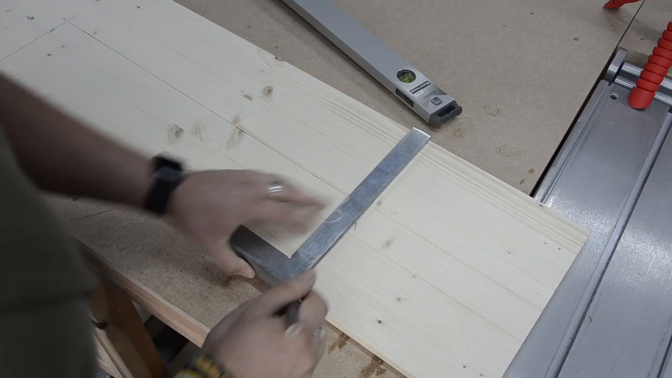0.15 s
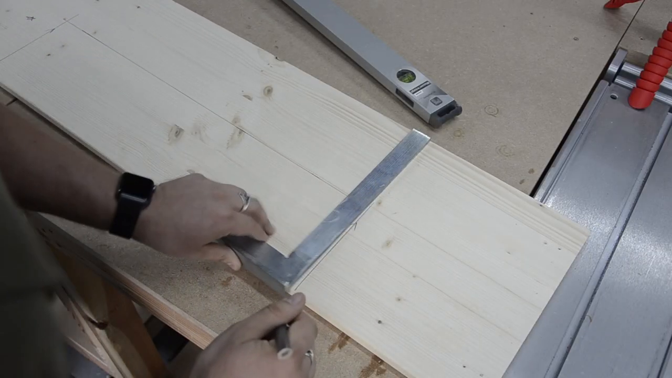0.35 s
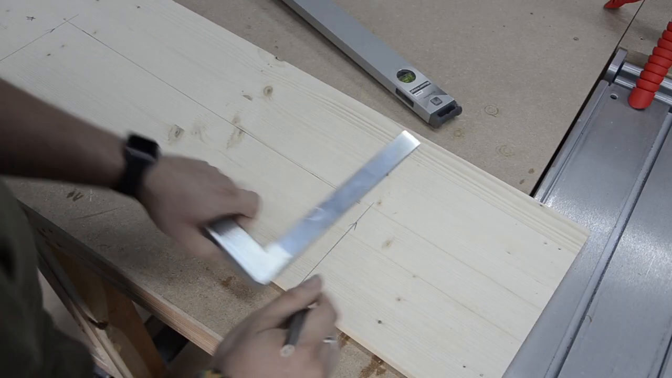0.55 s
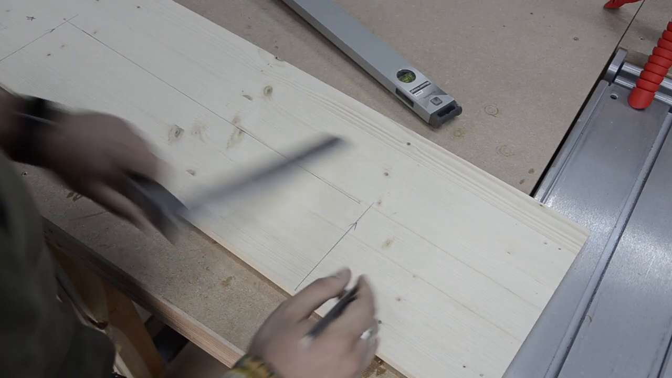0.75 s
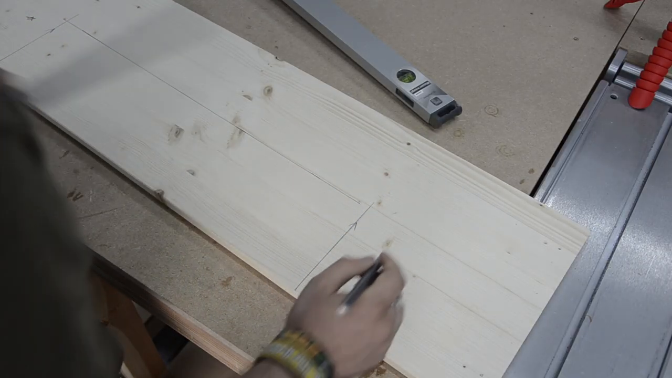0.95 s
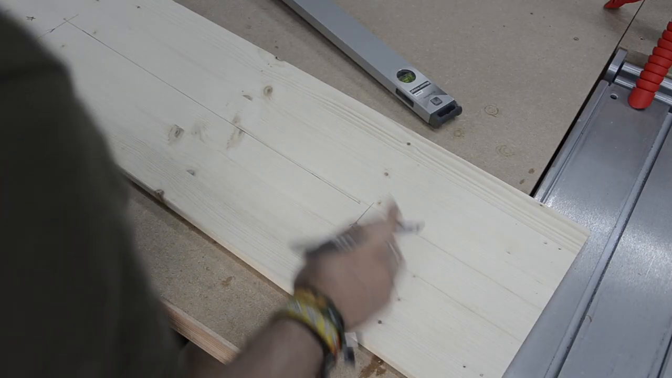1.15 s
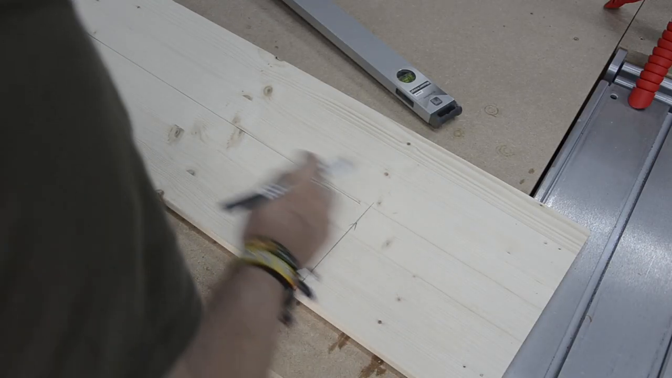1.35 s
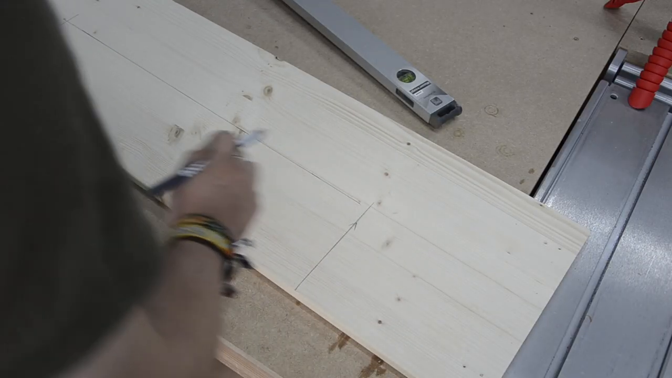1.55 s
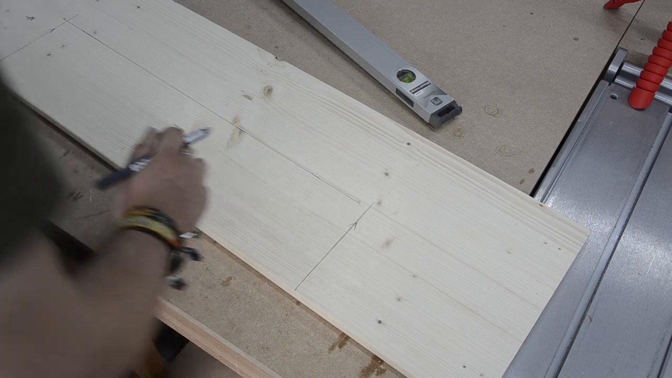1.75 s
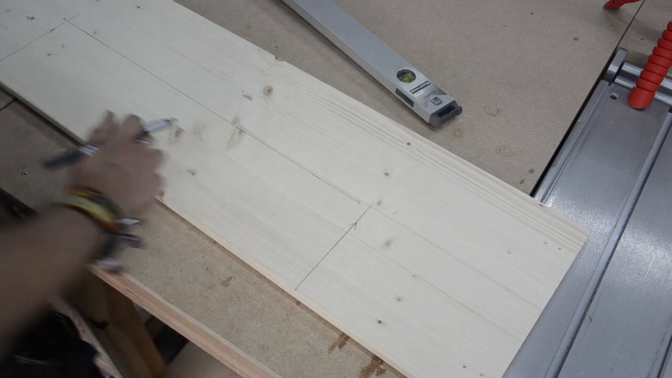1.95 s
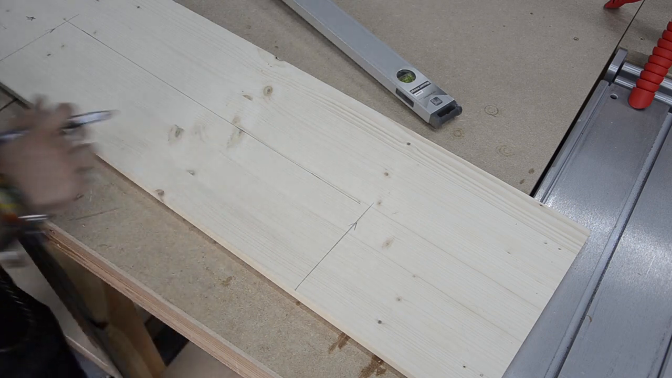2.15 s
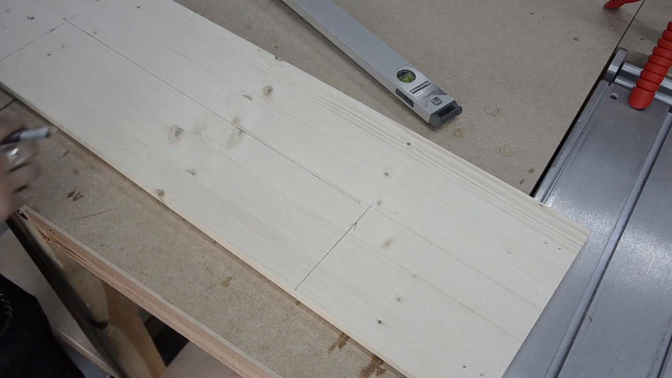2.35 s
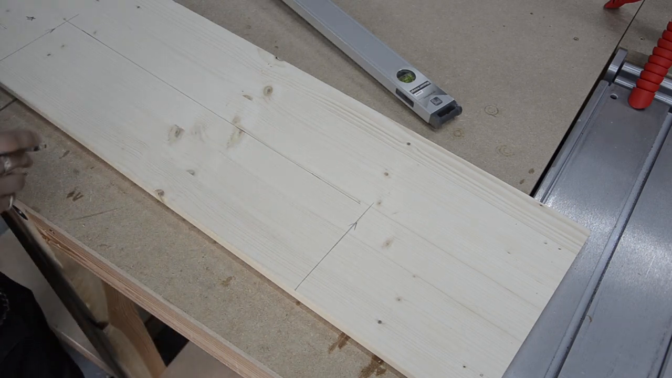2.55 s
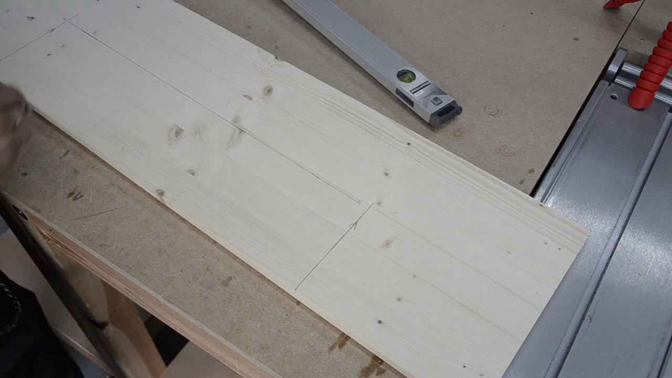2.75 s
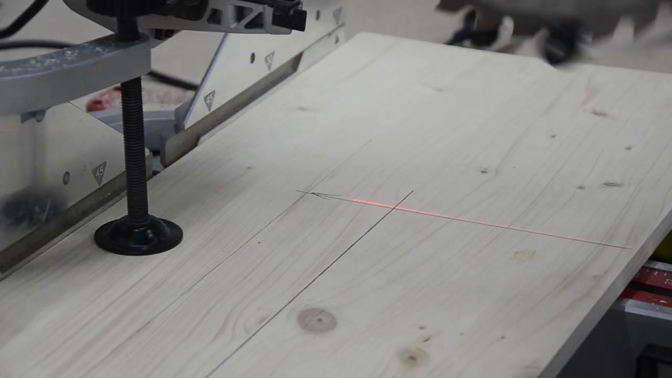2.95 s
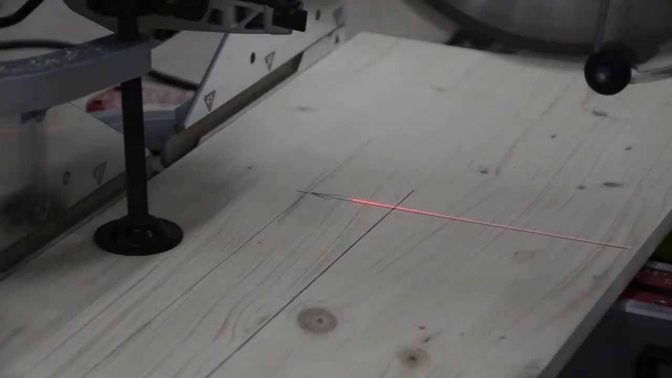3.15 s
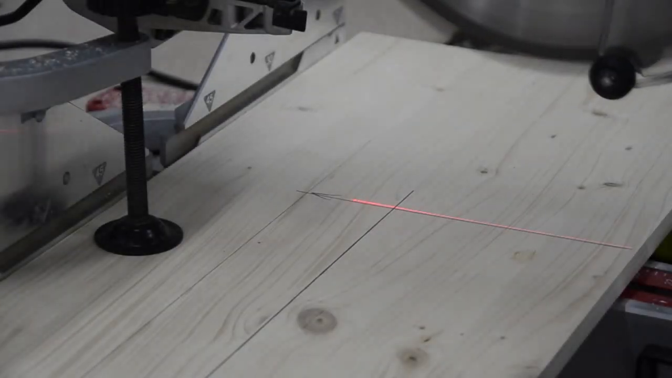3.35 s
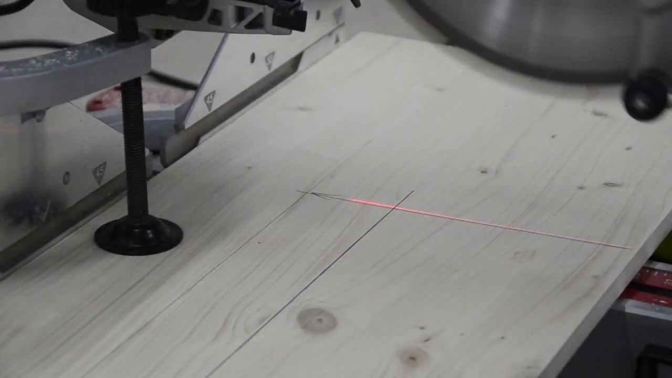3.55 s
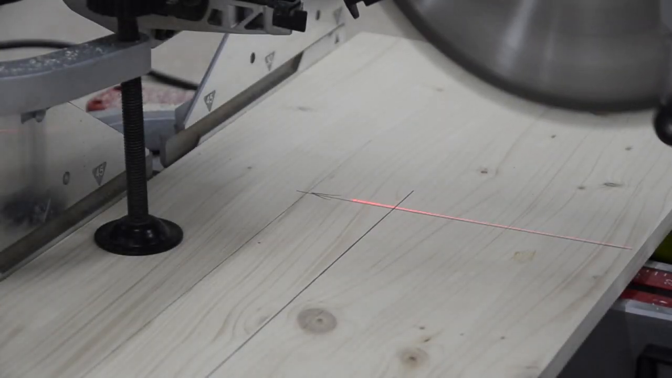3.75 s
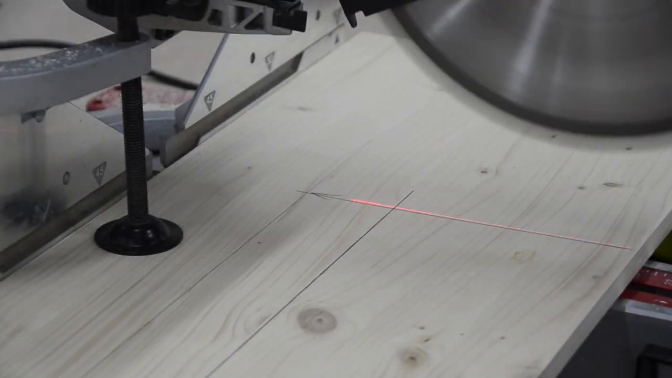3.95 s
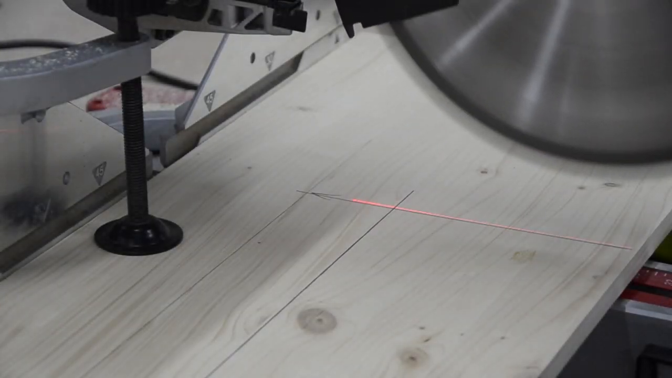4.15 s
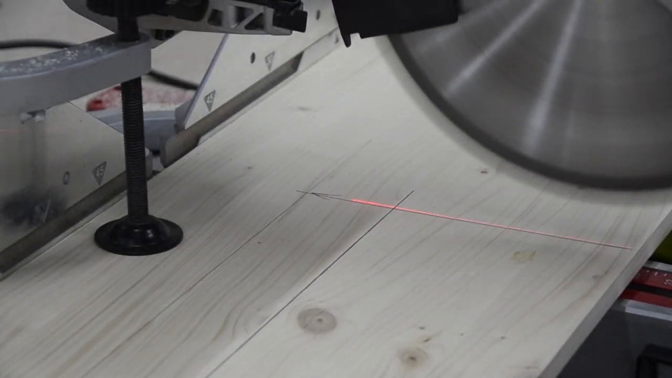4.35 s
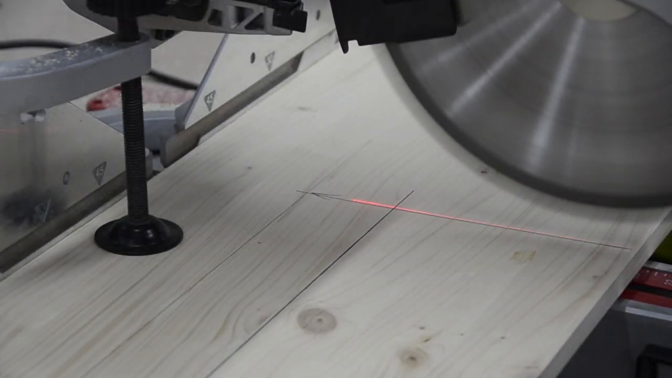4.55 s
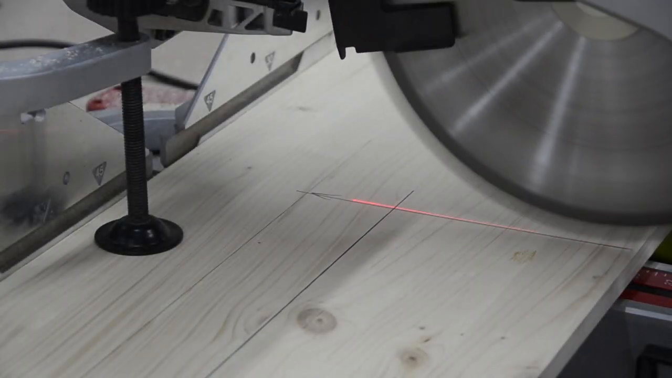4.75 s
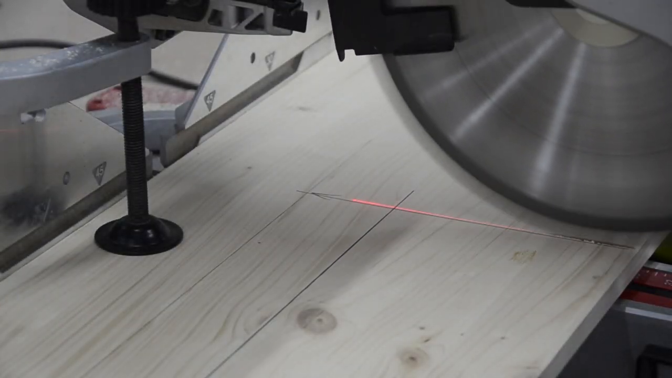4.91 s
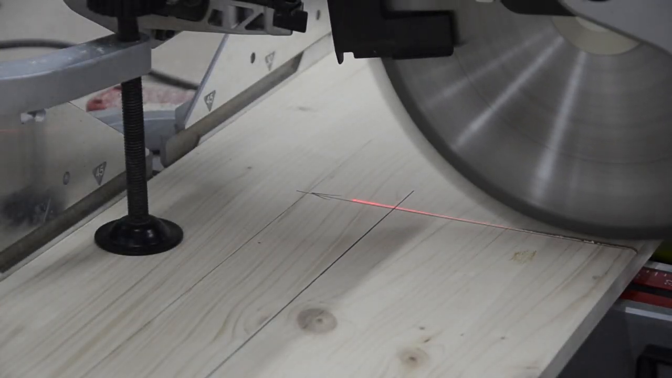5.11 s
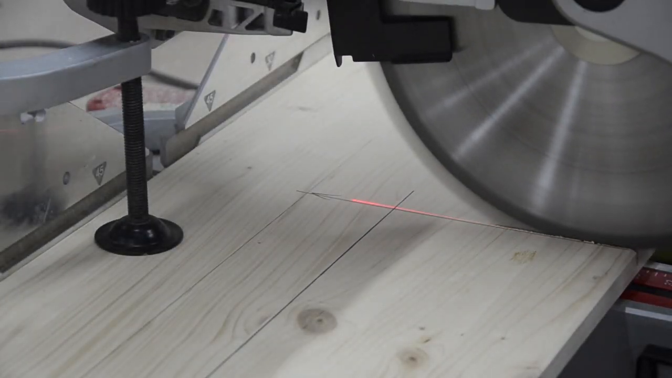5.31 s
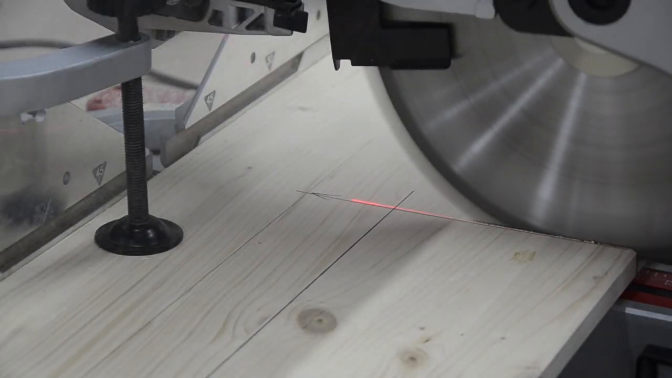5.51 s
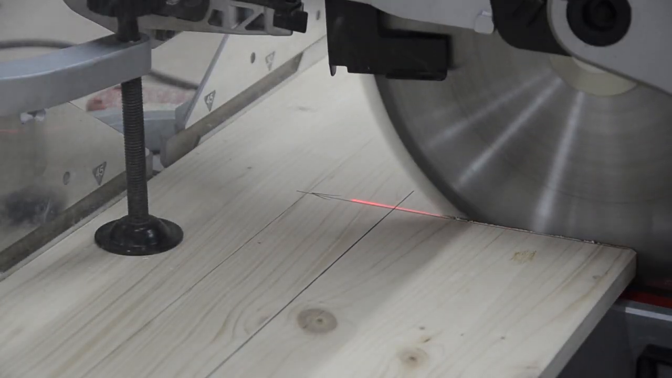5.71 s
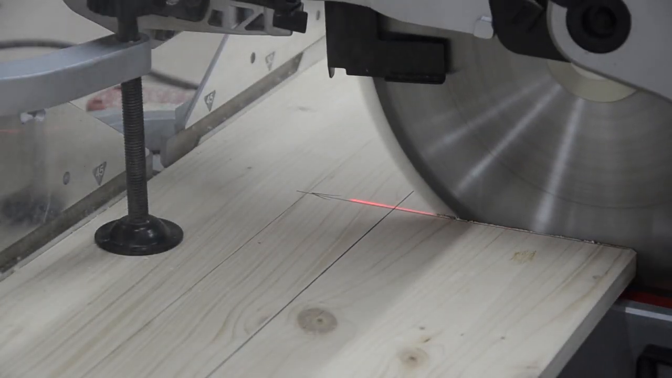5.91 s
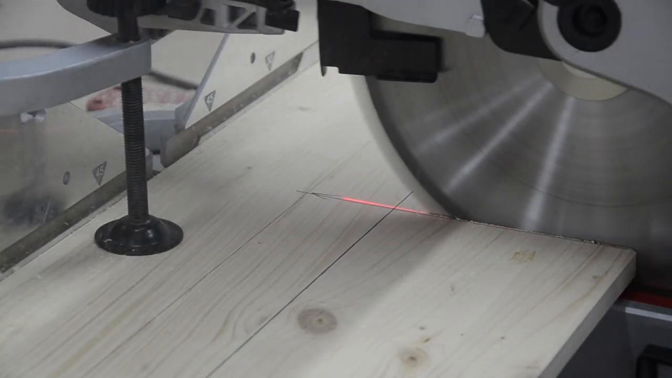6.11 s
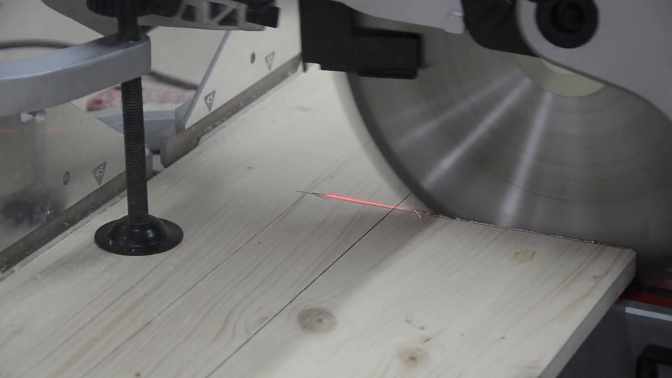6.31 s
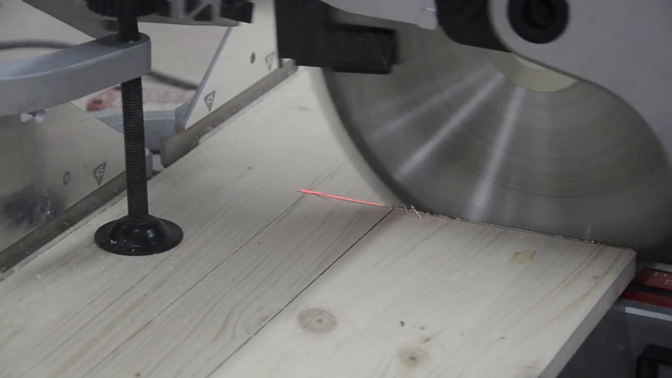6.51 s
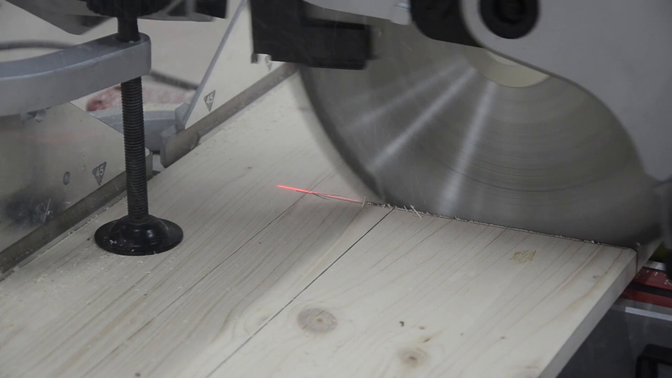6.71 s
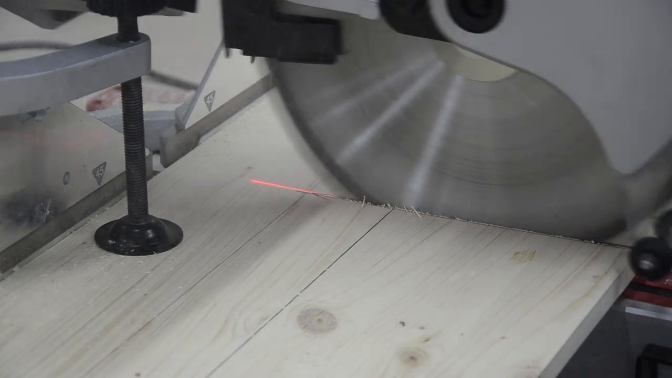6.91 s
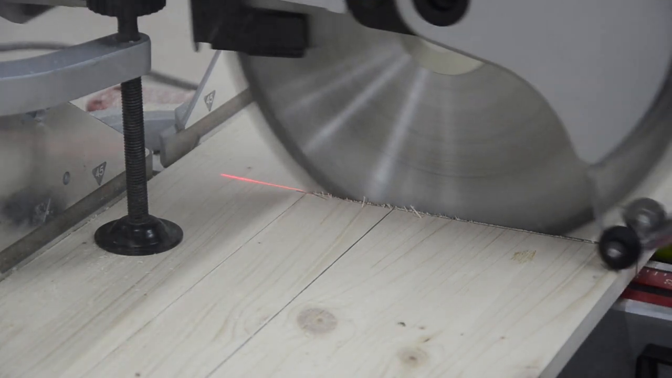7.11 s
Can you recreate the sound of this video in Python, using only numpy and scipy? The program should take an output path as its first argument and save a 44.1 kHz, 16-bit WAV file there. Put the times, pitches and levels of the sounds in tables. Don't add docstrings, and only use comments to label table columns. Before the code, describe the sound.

Quiet workshop handling, a short ringing steel scrape, sharp wooden knocks, then an abrupt change to a saw motor winding up and biting into a board.

```python
import sys
import numpy as np
from scipy import signal
from scipy.fft import rfft, irfft, next_fast_len
from scipy.io import wavfile
from scipy.ndimage import uniform_filter1d, map_coordinates

SR = 44100
rng = np.random.default_rng(int(sys.argv[2]) if len(sys.argv) > 2 else 0)


def materialize(psi):
    bounded = np.clip(np.atleast_2d(psi).T, -1, 1)
    quanta = np.round(bounded * 32767).astype(np.int16)
    wavfile.write(sys.argv[1], SR, quanta)


def gain_from_db(level_db):
    decades = np.asarray(level_db, float) / 20
    return 10 ** decades


N = 320607
EDIT_S = 2.863

# [f/Hz, level/dB]
SHOP_AIR = [(18, -37), (30, -3), (64, -5.5), (156, -4.5), (309, -11.5), (334, -11), (391, -13),
            (564, -15.5), (643, -17), (1240, -22.5), (1610, -20.5), (5090, -40), (13100, -52.5),
            (14500, -55), (15700, -45)]
SECOND_AIR = [(24, -41), (40, -5), (77, 3), (136, -14), (610, -11), (2070, -17.5), (5100, -35),
              (15700, -42.5)]
SHOP_DB, SECOND_AIR_DB = -55, -74.5

# [f/Hz, level/dB]
RUB = [(59, -38), (100, -9), (234, -19), (295, -4.5), (621, -13.5), (1060, -10), (2630, -24.5),
       (3320, -24.5), (4470, -36), (7770, -51), (16000, -65)]
# [f/Hz, level/dB]
EDGE_HISS = [(3000, -40), (5000, -4), (15000, -10.5)]
# [f/Hz, level/dB, freest t/s, spread/s]
SQUARE = [(2330, 1, 0.65, 0.042), (2810, 1.5, 0.646, 0.028), (3270, 5.5, 0.742, 0.034),
          (12000, -19, .72, .03), (3800, -10, 0.76, 0.034), (5000, -16.5, .56, .04), (5300, -13, 0.69, .04),
          (7470, -1, .7, 0.039), (9450, -16, 0.67, .07), (10300, -21, .72, 0.042),
          (11400, -19.5, 0.66, .05), (13400, -19, .72, .03)]
# [t/s, spread/s, level/dB]
JERKS = [
    (.6, .008, -1),
    (.662, 0.0073, 2),
    (.68, 0.0066, -1),
    (.692, .004, 4),
    (.702, 0.0035, -3),
    (.712, .005, 3.5),
    (.735, .006, -3),
    (.752, .006, -1),
    (.768, .005, 3),
]
# [f/Hz, width/Hz, level/dB, loudest t/s, spread/s]
GRAIN = (2250, 500, -57, .655, .04)
HAND = (2100, 700, -69, 0.8, 0.6)
BEAD = (3450, 200, -66, 1.672, .007)
DRAG_FROM_S, DRAG_PEAK_S, DRAG_TO_S = 0.02, 0.74, 0.87
RUB_DB, RUB_REST_DB, RUB_RISE, RUB_FALL = -39.5, -58, 72, 190
HISS_PEAK_S, HISS_DB, HISS_RISE, HISS_FALL = 0.68, -66.5, 20, 150

# [t/s, peak level/dB, centre f/Hz]
TICKS = [
    (0.255, -37, 10000),
    (.397, -50, 1210),
    (.499, -62, 7000),
    (.6, -54, 12000),
    (1.124, -62, 2500),
    (1.57, -60, 2500),
    (1.668, -50, 3400),
]
# [f/Hz, width/Hz, level/dB, loudest t/s, spread/s]
LEANING = [
    (278, 30, -59.5, 0.88, 0.12),
    (169, 25, -57, 1, 0.098),
    (90, 25, -66, 1, .15),
    (89, 28, -63, 1.43, .12),
    (260, 40, -62, 1.17, 0.076),
]

# [t/s, peak level/dB, thud level/dB, steel level/dB, edge level/dB]
TAPS = [
    (2.247, -12.5, -1.5, -20, 0),
    (2.272, -32.5, 2.5, -20, 3),
    (2.343, -14.5, -6, -25, -5),
    (2.391, -14, 9.5, -25.5, -12),
    (2.396, -24, -2.5, -12, 8),
    (2.4025, -11, 0, -30, -14),
    (2.408, -18, 5.5, -23.5, -14),
    (2.42, -14, -6.5, -18.5, -11),
    (2.595, -41.5, 0.5, -3, 0),
]
# [t/s, peak level/dB, thud level/dB, steel level/dB, edge level/dB]
DROP = [
    (2.6255, -17, -2.5, -21.5, -5),
    (2.6263, -3, -2, -21, 14),
    (2.6295, -14.5, 5, -20.5, 5),
    (2.634, -12.5, 3, -26.5, -13),
    (2.647, -11, -5, -15, -8.5),
    (2.655, -13.5, -16, -21, -15),
]
# [f/Hz, level/dB]
TAP_BODY = [(41, -46.5), (70, -11), (180, -3), (219, -10), (418, -1), (455, 1), (926, -9.5), (1250, -9),
            (1490, -13.5), (12000, -84), (15600, -110), (22000, -120)]
DROP_BODY = [(41, -36.5), (70, -11), (215, -15.5), (330, -6.5), (472, 1.5), (926, -3.5), (1010, -4.5),
             (1390, -1.5), (2910, -10), (4460, -33.5), (15000, -73.5)]
# [f/Hz, level/dB]
EDGE_BODY = [(1500, -27), (3000, 11), (8000, -21), (15000, -29)]
# [f/Hz, width/Hz, level/dB]
BOARD = [(474, 39, 3), (861, 36, 6), (1260, 110, 6.5), (1810, 26, -0.5), (2220, 50, -4.5)]
BENCH = [(160, 5.2, -0.5), (226, 22, 4.5)]
STRUCK_SQUARE = [(2350, 9, -5.5), (2770, 9, -1.5), (3260, 8, 3), (3880, 9, -6.5), (5000, 7, -12.5),
                 (5250, 9, -10), (5900, 9, -15), (7490, 9, -7.5), (9000, 12, -17)]
SNAP_DB = -5.5
# [f/Hz, t60/s]
ROOM = [(100, 0.76), (400, 0.4), (1000, 0.37), (3000, 0.41), (5000, 0.36), (9000, 0.17)]

# [t/s, peak level/dB]
SWITCH = [
    (3.075, -33.5),
    (3.081, -17),
    (3.084, -27.5),
    (3.104, -37),
]
# [f/Hz, level/dB]
SWITCH_BODY = [(120, -66), (200, -56), (677, 7.5), (842, -10), (1590, -8), (2380, -33), (4100, -22.5),
               (5700, -38), (8980, -35.5), (15500, -59.5)]

# [t/s, speed lost/turns per s]
LOAD = [
    (4.92, 0),
    (5.2, 1.15),
    (5.5, 3.45),
    (5.68, 4.8),
    (5.8, 4.7),
    (6.1, 2.85),
    (6.3, 2.55),
    (6.7, 3.1),
    (7, 3.6),
    (7.27, 4.3),
]
# [t/s, lag/turns per s]
HELD_BACK = [(3.08, 7), (3.12, 6.7), (3.15, 8.2), (3.19, 7.7), (3.21, 6.6), (3.255, 6), (3.28, 4.5),
             (3.32, .8), (3.34, 0)]
START_S, FREE_TURNS, LAG_TURNS, SPIN_UP_S = 3.08, 63, 50.7, 0.53
SOFT_END_S, SOFT_RELEASE_S = 3.24, 0.028
REACH_S, REACH_SPAN_S = 4.79, 0.085
FLUTTER_DB = 0.8

# [f/Hz, width/Hz, level/dB]
GEARCASE = [(560, 70, 1), (680, 70, -2), (900, 90, -1), (1150, 120, -2), (1390, 200, 1), (1610, 200, 1),
            (1880, 200, -1), (2280, 250, 1), (2600, 250, -3), (3350, 250, -4), (4080, 250, 1),
            (4580, 200, 0)]
# [order per blade turn], [level/dB]
GEAR_ORDERS = [6.5, 11.7, 13, 59, 109, 118, 133, 146, 160, 175, 186, 205, 250]
GEAR_DB = [-58, -50, -49, -56, -61, -61, -54, -65, -65, -68, -68, -73, -80]
# [order per blade turn], [level/dB]
OCTAVE_ORDERS = [75, 76, 77, 78, 79]
OCTAVE_SHARES_DB = [-14, -10, -4, -2.5, -14]
# [t/s, spread/s, level/dB]
OCTAVE_SWELLS = [(3.12, .05, -10), (3.22, .02, 4), (3.29, .03, 2), (3.37, .03, 1), (3.47, .06, -7),
                 (3.66, .06, 1), (3.8, .03, -3), (3.93, .07, 2), (4.09, .04, -3), (4.22, .04, 4),
                 (4.47, .07, 4), (4.68, .1, 3), (4.93, .05, 3), (5.15, .1, 2), (5.65, .12, -3),
                 (6.35, .2, 2), (6.75, .15, 5), (7.1, .1, 3)]
MESH_SWELLS = [(3.42, .07, 1), (3.62, .03, 3), (3.74, .04, 5), (4, .04, 3)]
# [order per blade turn], [level/dB]
HALF_MESH_ORDERS = [16, 17, 18, 20]
HALF_MESH_DB = [-50, -48, -46, -49]
# [order per blade turn, level/dB, power of torque]
SLACK = [(39, -23.5, 1.7), (78, -24, 3.2)]
MESH_DB, MESH_GROWS, OCTAVE_DB, OCTAVE_GROWS = -35, 0.61, -38.5, 0.35
WORN_S, WORN_SPAN_S = 3.47, 0.065
SLACK_HZ = 218.6
LEAD_S, LEAD_SPAN_S, LEAD_DB = 3.28, 0.03, -35
RUN_UP_WHINE_DB = 9
# [t/s, f/Hz, level/dB]
SQUEAL = [(3.185, 10600, -62), (3.21, 11300, -56), (3.25, 12400, -58), (3.35, 15300, -68)]
COMMUTATOR_DB, SEATING_FALL, SEATED_DB = -46, 190, -77

# [f/Hz, level/dB]
HOUSING = [(35, -49), (60, -28), (146, -54), (227, -10), (264, -14), (295, -5.5), (335, -11.5), (584, 2.5),
           (894, 4), (1180, 5.5), (2100, -8), (2340, -5.5), (2870, -8.5), (4640, -24.5), (5000, -30),
           (6500, -31.5), (11000, -120)]
# [f/Hz, width/Hz, level/dB]
HOUSING_MODES = [(598, 68, 3.5), (677, 6.7, -2), (802, 24, -5), (1240, 77, -3), (1372, 9.8, 10.5),
                 (1430, 21, -21), (1603, 320, 3.5), (1870, 85, -24), (1913, 106, 10.5)]
# [t/s, spread/s, level/dB]
SURGE = [(3.28, 0.07, 8.5)]
HOUSING_DB, HELD_DB, DUCK_DB = -31, -6, -1.5
# [f/Hz, level/dB]
FAN = [(1060, -21), (1800, -1), (4020, -4.5), (4660, -7.5), (5060, -12.5), (6070, -15), (7910, -11),
       (8590, -14), (12700, -26.5), (16000, -49.5)]
FAN_DB, FAN_GROWS, FAN_DUCK_DB = -34, 3.3, -3

# [f/Hz, level/dB]
SAWDUST = [(2940, -16), (5000, -1), (5170, -3), (6290, -5), (7240, -5.5), (8970, -7), (12600, -9.5),
           (14700, -16.5), (16000, -22)]
# [t/s, chips level/dB]
FEED = [(4.77, -55), (4.9, -40.5), (5.42, -40), (5.63, -40), (5.76, -37), (5.86, -48.5), (5.93, -42),
        (5.99, -47), (6.11, -45.5), (6.25, -50), (6.75, -40.5), (6.92, -43), (7.27, -38)]
RIM_DB, RIM_GROWS = -51.5, 0.62
TOOTH_MARK_DB = -3
DISC_DB, DISC_SPACING_HZ = 3, 90
# [f/Hz, width/Hz, level/dB, loudest t/s, spread/s]
RINGS = [(1165, 16, -35.5, 5.13, .05), (3350, 120, -43, 3.187, .012), (2280, 150, -38, 3.132, .013),
         (550, 30, -37, 3.19, .018), (698, 14, -39, 5.35, .17), (698, 14, -41, 6.35, .3),
         (698, 14, -41, 4.6, .1), (1328, 14, -43, 6.4, .25), (1750, 30, -42, 6.75, .25),
         (3500, 25, -49, 6.9, .3), (3500, 25, -50, 6.1, .15), (4050, 25, -51, 6.6, .5),
         (4660, 25, -46, 6.65, .2), (120, 8, -60, 5.45, .2), (1360, 140, -35, 3.42, .07),
         (1500, 140, -36, 3.55, .06), (160, 20, -59, 5.95, .06), (160, 20, -59, 6.7, .1),
         (1400, 80, -37, 3.22, .012), (880, 50, -38, 3.272, .012), (1900, 50, -39, 3.72, .05),
         (3510, 25, -43, 5.68, .12), (5050, 30, -54, 5.72, .08), (5450, 20, -50, 5.15, .12),
         (6000, 60, -54, 5.6, .2), (6900, 70, -50, 5.55, .15), (7100, 60, -55, 6.8, .3),
         (9700, 80, -56, 5.1, .2), (12200, 80, -56, 5.05, .2), (13100, 80, -55, 7, .25),
         (950, 30, -38, 7.22, .08), (1290, 25, -40, 5.8, .1),
         (1400, 40, -40, 3.62, .1), (1420, 30, -41, 4.05, .15), (1420, 25, -38, 4.97, .03),
              (1590, 30, -41, 4.97, .04), (1165, 14, -36, 5.19, .03), (1165, 14, -36, 5.07, .025),
              (950, 20, -39, 7.16, .04), (6850, 200, -57, 3.3, .015), (5000, 60, -53, 3.57, .04),
              (7700, 60, -56, 3.95, .12), (9150, 80, -56, 3.755, .015), (3600, 60, -49, 3.36, .025),
              (100, 50, -60, 3.3, .09), (75, 30, -66, 3.48, .07), (1740, 25, -40, 6.76, .04),
              (1780, 30, -41, 7.06, .04), (1320, 20, -40, 7.16, .03), (790, 14, -43, 6.15, .09)]

# [order per blade turn], [level/dB]
TOOTH_ORDERS = [37, 38, 40, 42, 80, 120, 160, 200, 220]
TOOTH_DB = [-39, -9, 0, -15, -10, -22, -25, -26, -31]
SET_ORDERS = [10, 18, 20, 22]
SET_DB = [-15, -5, 3.5, -6]
# [order per blade turn], [level/dB]
THUMP_ORDERS = [3, 4, 5, 7]
THUMP_DB = [-70.5, -64.5, -54.5, -55.5]
# [t/s, spread/s, every tooth level/dB, uneven set level/dB]
GRIPS = [(5.08, .06, -8, 4), (5.27, .06, 12, -8), (5.39, .03, -4, 0), (5.51, .05, 7.5, 5),
         (5.68, .09, 3, 3), (5.68, .02, 0, 7), (5.87, .04, -4, 0), (6.03, .05, 2, 10), (6.15, .04, 7.5, 2),
         (6.29, .035, 7, 0), (6.44, .08, 10, -3), (6.52, .04, 0, 10), (6.64, .03, 0, 9),
         (6.71, .06, 5.5, 0), (6.78, .04, 0, 10), (6.88, .04, 9, 4), (6.92, .05, 0, 9), (7.07, .06, 3, -3),
         (7.22, .05, -5, -3)]
# [t/s, spread/s, runout level/dB, odd thumps level/dB, fourth-order thump level/dB]
SHUDDERS = [
    (4.6, 0.097, 10, 8.5, 0),
    (4.95, 0.28, 1, 8, 3),
    (5.25, 0.053, -5, 3.5, 1),
    (5.45, 0.067, -3, 12.5, 17),
    (5.7, 0.11, 8, -7, 14),
    (5.93, 0.053, -4, -12, 8),
    (6.11, 0.057, 5, 5.5, 1),
    (6.35, 0.15, -3, 1.5, -3),
    (6.75, 0.1, 3, -1, 2),
    (7.12, 0.15, 3, 2, 14.5),
]
TEETH_DB, TEETH_IDLE_DB, SET_IN_CUT_DB, SET_IDLE_DB = -44.2, -15, -50.5, -20
RUNOUT_DB, RUNOUT_IDLE_DB, THUMP_IDLE_DB = -57.5, -18, -17

# [t/s, peak level/dB]
SNAGS = [
    (3.47, -24),
    (3.497, -26),
    (5.538, -22),
    (5.553, -25),
    (5.768, -25),
    (5.801, -22),
    (6.005, -26),
]
# [f/Hz, level/dB]
SNAG_BODY = [(250, -60), (600, 0), (2500, -4), (6000, -18), (15000, -40)]


def unit(x):
    return x / np.sqrt(np.mean(x ** 2) + 1e-20)


def along(points, hz):
    f, v = np.transpose(points)
    return np.interp(np.log(hz + 1), np.log(f + 1), v)


def curves(rows):
    s, *cols = np.transpose(rows)
    return [np.interp(np.arange(N) / SR, s, c) for c in cols]


def between(start, end):
    return (np.arange(N) >= start * SR) & (np.arange(N) < end * SR)


def step(s, span):
    return 0.5 + 0.5 * np.tanh((np.arange(N) / SR - s) / span / 2)


def peak(s, db, rise, fall):
    t = np.arange(N) / SR - s
    return db - np.where(t < 0, -rise * t, fall * t)


def bell(s, spread):
    return np.exp(-0.5 * ((np.arange(N) / SR - s) / spread) ** 2)


def swells(rows):
    s, spread, *cols = np.transpose(rows)
    bells = np.exp(-0.5 * ((np.arange(N)[:, None] / SR - s) / spread) ** 2)
    return [bells @ c for c in cols]


def wobble(rate):
    knots = rng.standard_normal(int(N * rate / SR) + 4)
    return map_coordinates(knots, [np.arange(N) * rate / SR])


def filtered(x, response):
    m = next_fast_len(N + SR // 2)
    return irfft(rfft(x, m) * response(np.fft.rfftfreq(m, 1 / SR)), m)[:N]


def resonances(modes):
    def response(f):
        total = 0
        for k, (centre, width, db) in enumerate(modes):
            damping = 1j * f * width
            total = total + (-1) ** k * gain_from_db(db) * damping / (centre * centre - f * f + damping)
        return total
    return response


def coloured(x, spectrum):
    return unit(filtered(x, lambda hz: gain_from_db(along(spectrum, hz))))


def sing(drive, hz, width_hz, db, s, spread):
    mode = resonances([(hz, width_hz, 0)])
    ring = filtered(drive, lambda f: mode(f) ** 2)
    steady = ring / (np.abs(uniform_filter1d(ring ** 2, size=2400)) + 1e-12) ** 0.48
    return gain_from_db(db) * bell(s, spread) * unit(steady)


def crack(s, db, t60, body):
    burst, t = np.zeros(N), np.arange(4000) / SR
    burst[round(s * SR):][:len(t)] = gain_from_db(db - 60 * t / t60) * (1 - np.exp(-t / 0.0015))
    return burst * coloured(rng.standard_normal(N), body)


def room(x):
    hz, t, z = signal.stft(rng.standard_normal(SR // 2), SR, nperseg=256)
    decay = gain_from_db(-60 * t / along(ROOM, hz)[:, None])
    tail = signal.istft(z * decay, SR, nperseg=256)[1]
    late = np.pad(x, (150, 0))
    return signal.fftconvolve(late, tail / np.linalg.norm(tail))[:N]


def shop_air():
    first = gain_from_db(SHOP_DB + 1.6 * wobble(9.8)) * coloured(rng.standard_normal(N), SHOP_AIR)
    second = gain_from_db(SECOND_AIR_DB) * coloured(rng.standard_normal(N), SECOND_AIR)
    return np.where(between(0, EDIT_S), first, second)


def drag():
    jerk_db = swells(JERKS)[0]
    rub_db = np.maximum(peak(DRAG_PEAK_S, RUB_DB, RUB_RISE, RUB_FALL), RUB_REST_DB) + jerk_db
    hiss_db = peak(HISS_PEAK_S, HISS_DB, HISS_RISE, HISS_FALL) + jerk_db
    grit = rng.standard_normal(N) * gain_from_db(0.8 * wobble(120))
    rub = gain_from_db(rub_db) * coloured(grit, RUB)
    hiss = gain_from_db(hiss_db - 7) * coloured(grit, EDGE_HISS)
    ring = sum(sing(grit, hz, 42, db - 59, s, spread) for hz, db, s, spread in SQUARE)
    touches = sing(grit, *GRAIN) + sing(grit, *HAND) + sing(grit, *BEAD)
    return between(DRAG_FROM_S, DRAG_TO_S) * (rub + hiss) + ring + touches


def ticks():
    out = np.zeros(N)
    for s, db, hz in TICKS:
        body = [(hz / 4, -30), (hz / 2, -6), (hz, 0), (2 * hz, -20)]
        snap = np.arange(N) == round(s * SR)
        click = coloured(snap * 1.0, body)
        out += crack(s, db - 8, 0.004, body) + gain_from_db(db - 1) * click / click.max()
    return out


def leaning():
    drive = rng.standard_normal(N) * gain_from_db(3 * wobble(25))
    return sum(sing(drive, *mode) for mode in LEANING)


def blow(s, db):
    force, t = np.zeros(N), np.arange(60) / SR
    pulse = (t / 0.00006) ** 2 * np.exp(-t / 0.00006) / 2
    force[round(s * SR):][:len(t)] = gain_from_db(db - 12) * pulse
    return force


def knocks(contacts, body, t60, board_db, room_db):
    out = np.zeros(N)
    for s, db, thud_db, steel_db, edge_db in contacts:
        force = blow(s, db)
        near = gain_from_db(board_db) * filtered(force, resonances(BOARD))
        near += gain_from_db(thud_db + 29.5) * filtered(force, resonances(BENCH))
        near += gain_from_db(steel_db + 43.5) * filtered(force, resonances(STRUCK_SQUARE))
        near += crack(s, db - 6, t60, body)
        edge = crack(s, db + edge_db - 17.5, 0.0073, EDGE_BODY)
        edge += gain_from_db(edge_db + SNAP_DB) * np.gradient(np.gradient(force))
        out += near + edge + gain_from_db(room_db) * room(near)
    return out * between(0, EDIT_S)


def switch():
    near = sum(crack(s, db, 0.046, SWITCH_BODY) for s, db in SWITCH)
    return near + gain_from_db(-9.5) * room(near)


def motor():
    lag = LAG_TURNS * np.exp(-np.maximum(np.arange(N) / SR - START_S, 0) / SPIN_UP_S)
    load = uniform_filter1d(curves(LOAD)[0], size=5000)
    held_back = uniform_filter1d(curves(HELD_BACK)[0], size=600)
    return FREE_TURNS - lag - load - held_back, (lag + load) / LAG_TURNS


def whine(turns, orders, levels_db, waver_db, runout=0, rate=7):
    bend = runout * np.sin(2 * np.pi * turns)
    out = np.zeros(N)
    for order, db in zip(orders, levels_db):
        level = np.sqrt(2) * gain_from_db(db + waver_db * wobble(rate))
        out += level * np.sin(2 * np.pi * order * turns + bend + 0.45 * wobble(2 * rate))
    return out


def case_gain(hz):
    power = sum(np.abs(resonances([mode])(hz)) ** 2 for mode in GEARCASE)
    return 0.048 * np.minimum(hz / 900, 1) + np.sqrt(power)


def gears(turns, speed, torque):
    mesh = gain_from_db(MESH_DB + swells(MESH_SWELLS)[0]) * step(3.17, 0.006) * torque ** MESH_GROWS
    out = mesh * case_gain(39 * speed) * whine(turns, [39], [0], waver_db=3, runout=1.8, rate=110)
    octave = gain_from_db(OCTAVE_DB + swells(OCTAVE_SWELLS)[0]) * torque ** OCTAVE_GROWS * case_gain(78 * speed)
    out += octave * whine(turns, OCTAVE_ORDERS, OCTAVE_SHARES_DB, waver_db=3, runout=0.2, rate=90)
    out += between(3.34, 3.82) * whine(turns, [320], [-67], waver_db=3, runout=1.5, rate=120)
    for order, db, grows in SLACK:
        level = gain_from_db(db) * torque ** grows * step(SOFT_END_S, SOFT_RELEASE_S) * case_gain(order * speed)
        out += level * wobble(SLACK_HZ) * np.sin(2 * np.pi * order * turns)
    motor_turns = np.cumsum(speed + curves(HELD_BACK)[0]) / SR
    out += bell(LEAD_S, LEAD_SPAN_S) * whine(motor_turns, [78], [LEAD_DB], waver_db=3, rate=110)
    worn = whine(turns, HALF_MESH_ORDERS, HALF_MESH_DB, waver_db=3, rate=40)
    out += bell(WORN_S, WORN_SPAN_S) * worn
    pace = speed / FREE_TURNS
    out += pace ** 6 * whine(turns, GEAR_ORDERS[:3], GEAR_DB[:3], waver_db=2, rate=20)
    upper = whine(turns, GEAR_ORDERS[3:], GEAR_DB[3:], waver_db=3.2, runout=0.4, rate=45)
    return out + pace ** 2 * gain_from_db(RUN_UP_WHINE_DB * torque) * upper


def brushes(turns, speed):
    seating = gain_from_db(peak(3.13, COMMUTATOR_DB, 750, SEATING_FALL))
    sparks = case_gain(234 * speed) ** 3 * seating + gain_from_db(SEATED_DB)
    squeal_hz, squeal_db = curves(SQUEAL)
    squeal = np.sin(2 * np.pi * np.cumsum(squeal_hz) / SR + 3 * wobble(300))
    out = sparks * whine(turns, [234], [0], waver_db=4, rate=40)
    return out + between(3.185, 3.35) * gain_from_db(squeal_db - 5) * squeal


def housing(rattle, speed, away, flutter_db):
    level_db = HOUSING_DB + HELD_DB * (1 - step(3.5, 0.0087)) + swells(SURGE)[0]
    level_db = level_db + DUCK_DB * (1 - away) + 0.31 * flutter_db
    modes = resonances(HOUSING_MODES)
    roar = coloured(filtered(rattle, lambda hz: 1 + 0.5 * modes(hz)), HOUSING)
    deep = filtered(roar, lambda hz: hz < 480)
    return gain_from_db(level_db) * (roar - deep * (1 - np.clip(speed / 60, 0, 1) ** 0.61))


def fan(rattle, pace_db, away, flutter_db):
    level_db = FAN_DB + FAN_GROWS * pace_db + FAN_DUCK_DB * (1 - away) + flutter_db
    return gain_from_db(level_db) * coloured(rattle * gain_from_db(0.93 * wobble(60)), FAN)


def ridged(x):
    ridges = rng.standard_normal((2, 300))

    def through(ridge):
        spots = np.arange(len(ridge))
        return filtered(x, lambda hz: gain_from_db(DISC_DB * np.interp(hz / DISC_SPACING_HZ, spots, ridge)))
    turn = np.pi / 4 * (1 + np.tanh(wobble(2.5)))
    return np.cos(turn) ** 2 * through(ridges[0]) + np.sin(turn) ** 2 * through(ridges[1])


def sawdust(turns, pattern, pace_db, away, flutter_db):
    rim = gain_from_db(RIM_DB + RIM_GROWS * pace_db + flutter_db) * away
    cut = gain_from_db(curves(FEED)[0]) * step(4.7, 0.03)
    chips = rng.standard_normal(N) * gain_from_db(1.1 * wobble(200) + 3.3 * np.sin(2 * np.pi * turns))
    marks = gain_from_db(TOOTH_MARK_DB + 1.3 * wobble(5)) * pattern
    hiss = np.hypot(rim, cut) * coloured(ridged(chips + marks), SAWDUST)
    return hiss + sum(sing(chips, *mode) for mode in RINGS)


def blade_tones(turns, tooth_db, set_db, away):
    _, odd_db, fourth_db = shudder_db(away)
    tones = gain_from_db(tooth_db) * whine(turns, TOOTH_ORDERS, TOOTH_DB, waver_db=1.7, rate=45)
    tones += gain_from_db(set_db) * whine(turns, SET_ORDERS, SET_DB, waver_db=1.2, rate=10)
    thump_db = np.c_[THUMP_DB] + [odd_db, fourth_db, odd_db, odd_db]
    return tones + between(3.3, 8) * whine(turns, THUMP_ORDERS, thump_db, waver_db=0.5)


def shudder_db(away):
    return swells(SHUDDERS) + np.outer([RUNOUT_IDLE_DB, THUMP_IDLE_DB, THUMP_IDLE_DB], away)


def blade_runout(turns, away):
    level = gain_from_db(RUNOUT_DB + shudder_db(away)[0] + 1.3 * wobble(6))
    return level * np.sqrt(2) * np.sin(2 * np.pi * turns)


def saw():
    speed, torque = motor()
    turns = np.cumsum(between(START_S, 8) * speed) / SR
    pace_db = 20 * np.log10(speed / FREE_TURNS)
    away = 1 - step(REACH_S, REACH_SPAN_S)
    flutter_db = FLUTTER_DB * away * wobble(14)
    tooth_grip_db, set_grip_db = swells(GRIPS)
    tooth_db = tooth_grip_db + TEETH_DB + TEETH_IDLE_DB * away
    set_db = set_grip_db + SET_IN_CUT_DB + SET_IDLE_DB * away ** 2
    pattern = rng.standard_normal(720)[(turns % 1 * 720).astype(int)]
    rattle = rng.standard_normal(N) + gain_from_db(tooth_db + 31) * pattern
    mesh = gears(turns, speed, torque) + brushes(turns, speed)
    noise = housing(rattle, speed, away, flutter_db) + fan(rattle, pace_db, away, flutter_db)
    noise += sawdust(turns, pattern, pace_db, away, flutter_db)
    tones = blade_tones(turns, tooth_db, set_db, away)
    echoes = gain_from_db(-8) * room(mesh) + gain_from_db(-18) * room(tones)
    return between(3.085, 8) * (noise + mesh + tones + echoes + blade_runout(turns, away))


def snags():
    return sum(crack(s, db - 2, 0.02, SNAG_BODY) for s, db in SNAGS)


def scene():
    taps = knocks(TAPS, TAP_BODY, t60=0.043, board_db=26.5, room_db=-4)
    drop = knocks(DROP, DROP_BODY, t60=0.069, board_db=31.5, room_db=-5)
    bench = shop_air() + drag() + ticks() + leaning() + taps + drop
    return (bench + switch() + saw() + snags())[None]


def low_pass(x):
    return signal.sosfilt(signal.butter(12, 16510, fs=SR, output="sos"), x)


def record(dry):
    thin = filtered(dry[0], lambda hz: (1j * hz / (45 + 1j * hz)) ** 2)
    held = thin / (1 + np.abs(thin / 0.8) ** 10) ** 0.1
    band = filtered(held, lambda hz: np.where(hz < 15740, 1, gain_from_db(-26)) * (hz < 16500))
    return low_pass(band[None])


dry = scene()
out = record(dry)
materialize(out)
```